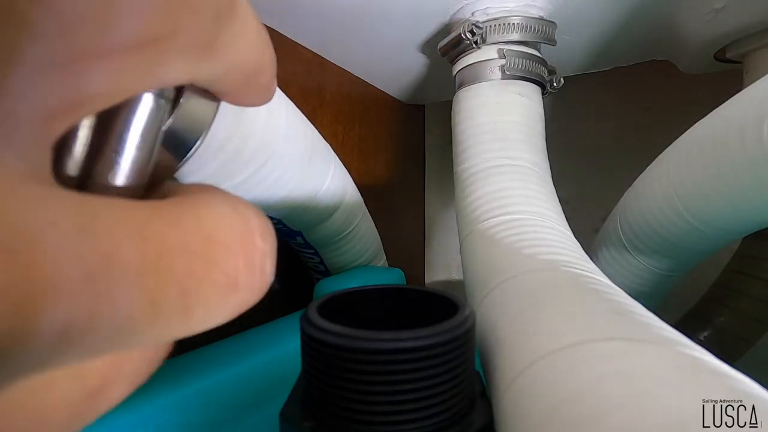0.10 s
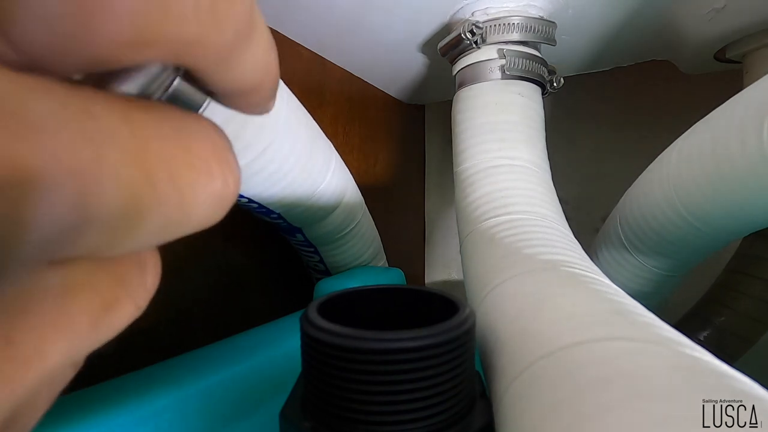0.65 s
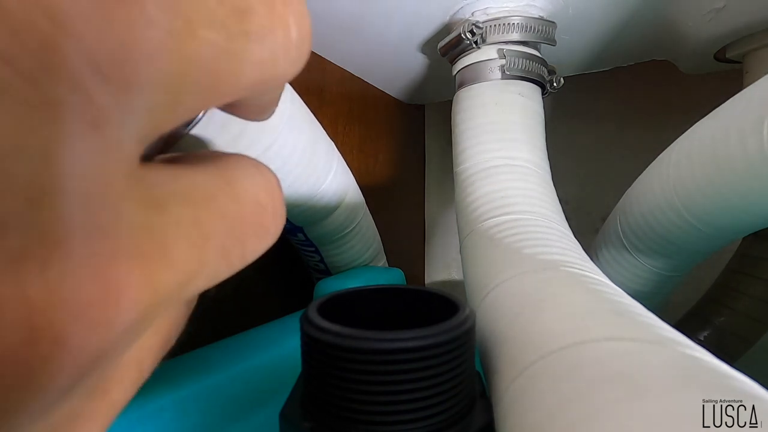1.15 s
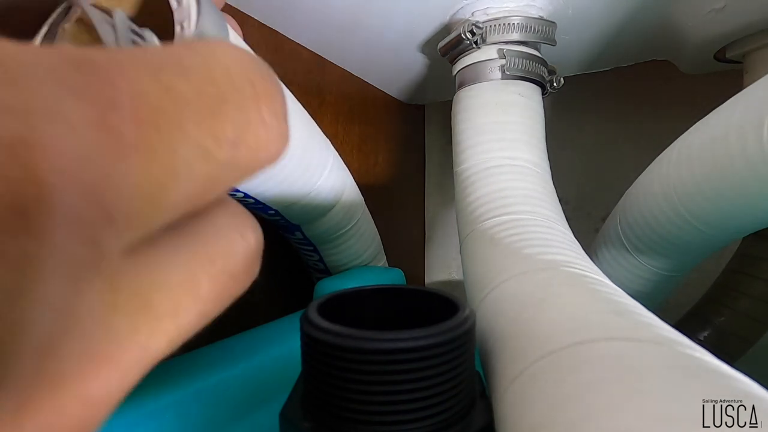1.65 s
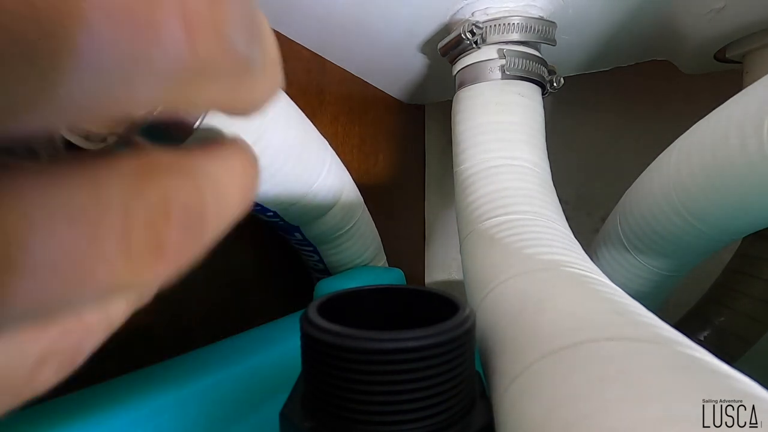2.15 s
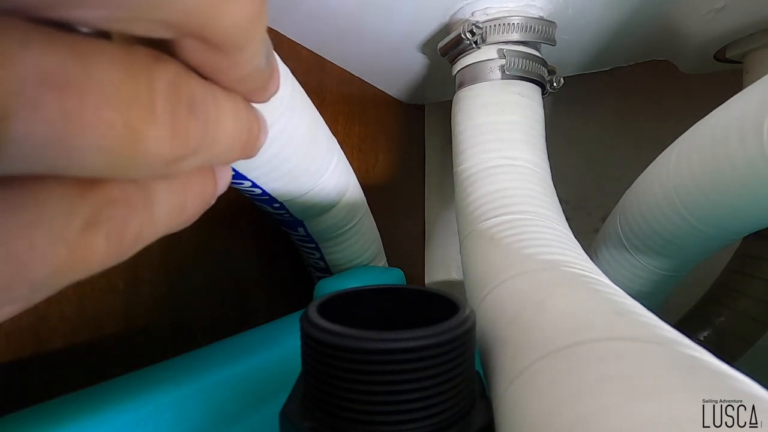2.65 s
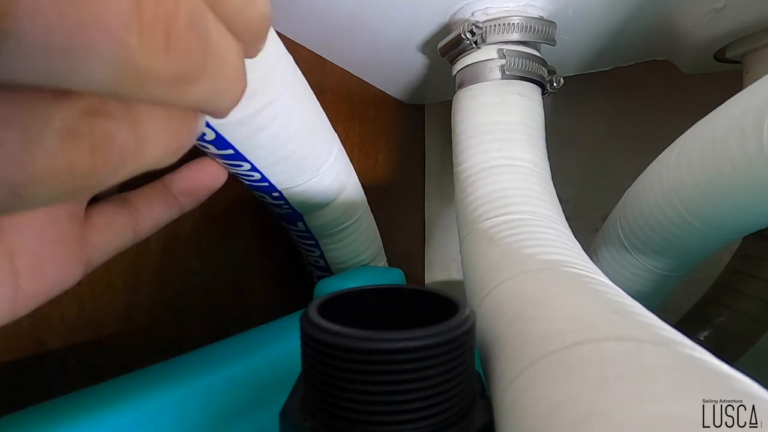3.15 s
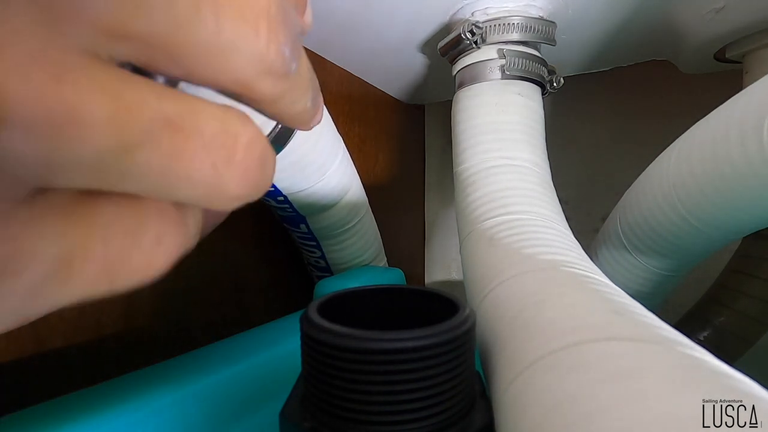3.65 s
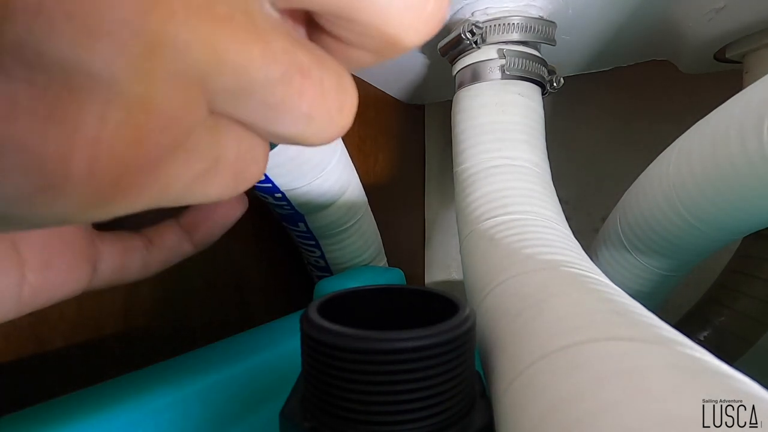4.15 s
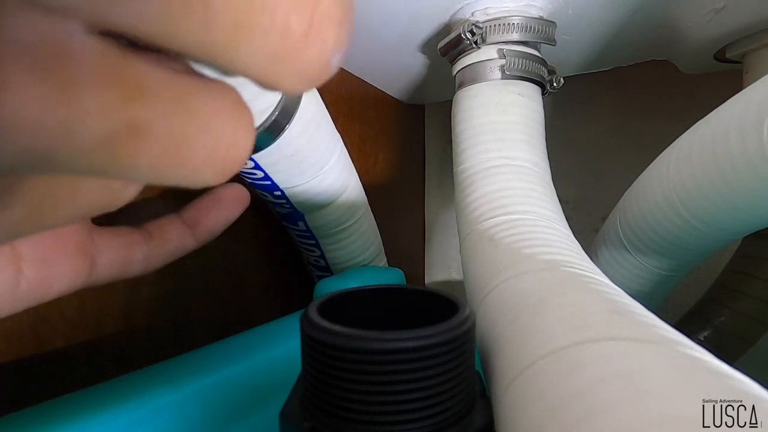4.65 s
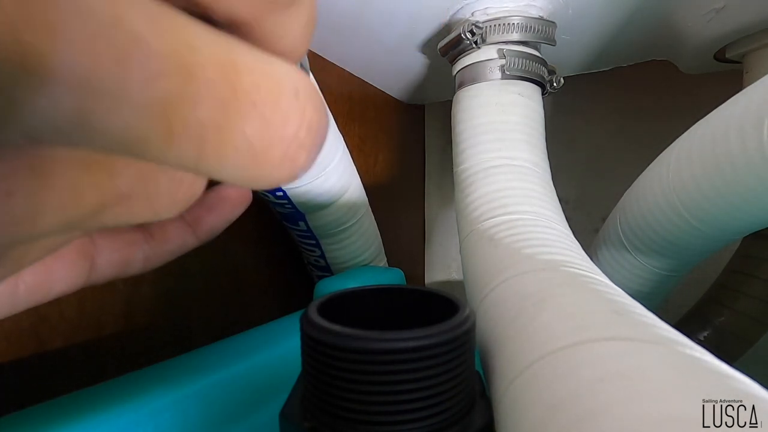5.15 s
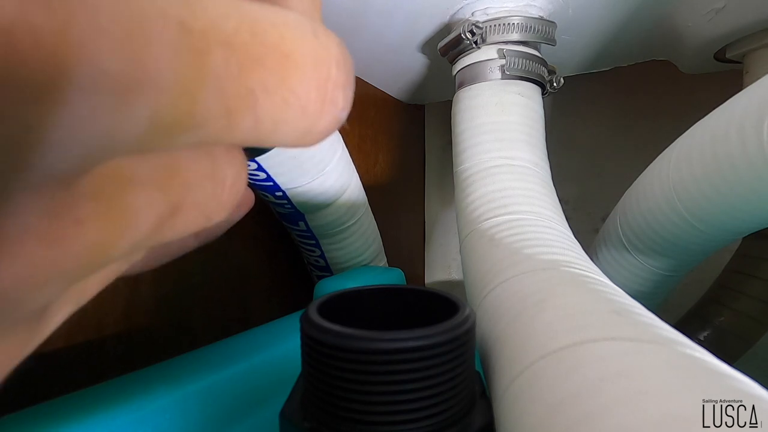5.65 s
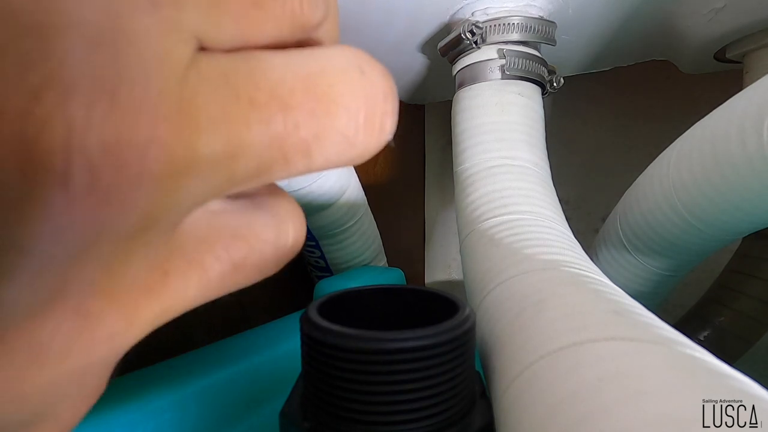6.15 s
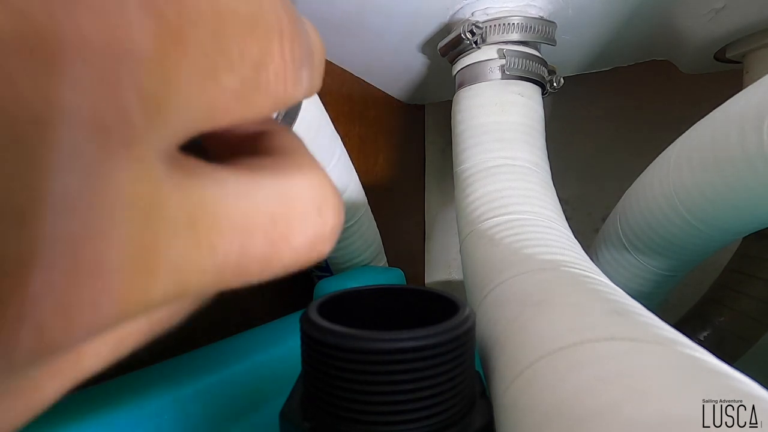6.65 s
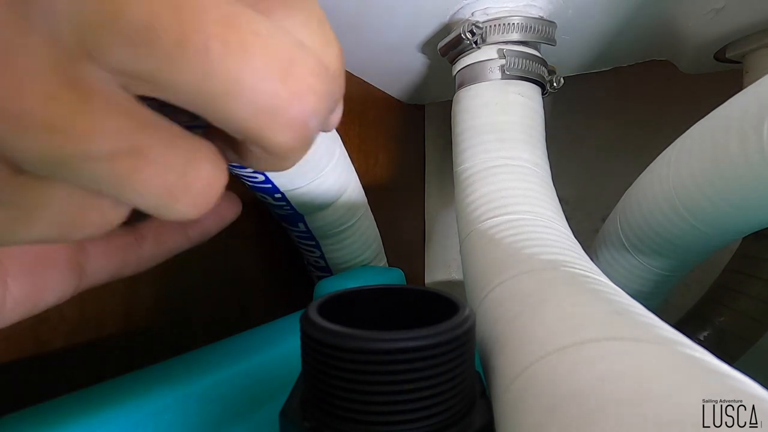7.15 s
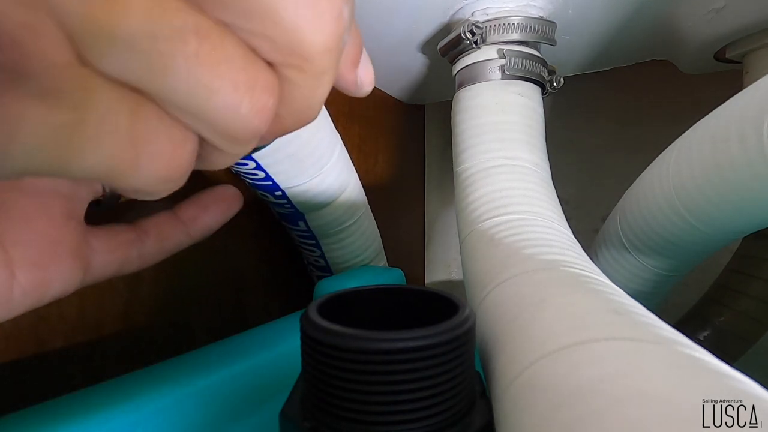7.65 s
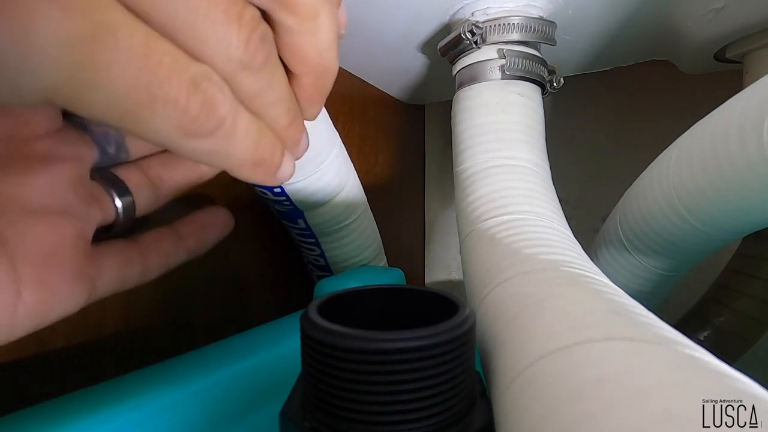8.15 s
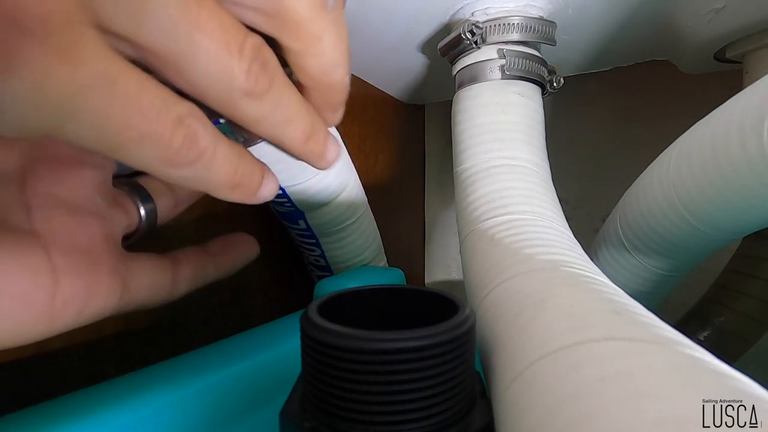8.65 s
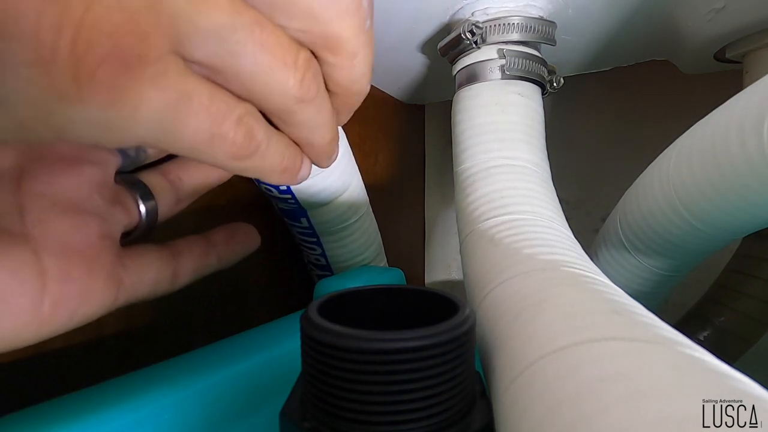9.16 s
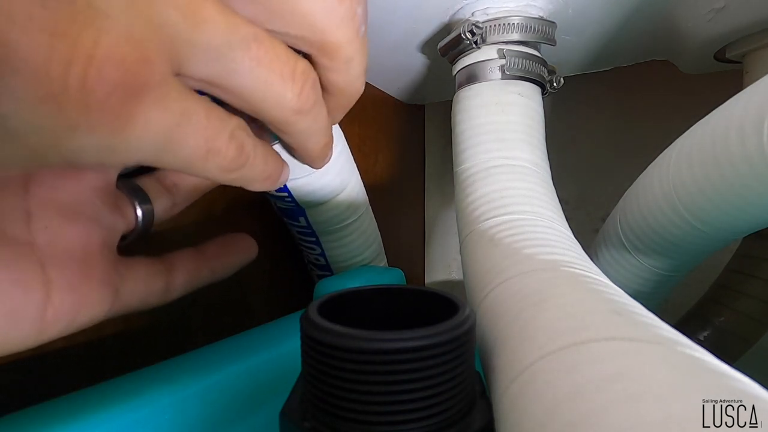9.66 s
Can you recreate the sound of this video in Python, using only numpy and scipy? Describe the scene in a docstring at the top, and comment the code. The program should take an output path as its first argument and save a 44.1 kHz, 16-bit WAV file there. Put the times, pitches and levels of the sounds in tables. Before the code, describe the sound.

Hands fit metal bands onto a flexible plastic hose. A bright jingle and sharp clicks come first, then mostly dull, bassy bumps and muffled creaking pressure with weak ticks and rubbing. Stronger thuds come near the end, then crisp steel taps. The small enclosed space gives short dense reflections; the close microphone picks up handling rumble, a low murmur and faint hiss.

```python
"""Hands work steel clamps onto a ribbed plastic hose in a cramped boat locker, close to a small camera.
Throughout: a low murmur, hiss, and dull thuds of bumps swinging the panel under the microphones.
Until 0.45 s loose clamps jingle, damped more and more; then gripped clamps tap and scrape along the
hose, with faint squeaks from 0.87 s; bright taps return from 8.8 s. Hits and strokes are noise and
pulses through resonances of panel, steel and hose; dense reflections make the locker."""
import sys
import numpy as np
from scipy import signal
from scipy.fft import rfft, irfft, next_fast_len
from scipy.io import wavfile
from scipy.ndimage import uniform_filter1d, map_coordinates

SR = 44100
rng = np.random.default_rng(int(sys.argv[2]) if len(sys.argv) > 2 else 0)


def convert_level_to_amplitude(level_db):
    """Map a level in decibels to its linear amplitude factor."""
    exponent = np.asarray(level_db, float) / 20
    return 10 ** exponent


def transcribe(u):
    """Save the signal u as a 16-bit wav file named by the first command-line argument.

    u: samples, shape (n,) or (channels, n), limited to [-1, 1]; the rate is SR.
    q: integer samples, one column per channel.
    """
    v = np.clip(np.atleast_2d(u).T, -1, 1)
    q = np.round(v * 32767).astype(np.int16)
    wavfile.write(sys.argv[1], SR, q)


N = 430857

# hands leaning on the panel: t/s, drive level/dB
PRESSURE = [(0.0, -37), (0.38, -37), (0.62, -28.5), (1.0, -25), (1.3, -31.5), (1.9, -37), (2.5, -25),
            (2.75, -42.5), (3.26, -33), (4.49, -33), (4.621, -40.5), (5.85, -36.5), (6.26, -26),
            (7.24, -65), (7.9, -25), (8.3, -40), (8.76, -31.5), (9.09, -42), (9.77, -38)]
# upper panel modes under the leaning hands: t/s, level/dB re main drive
UPPER_LEVEL = [(0, -18.5), (0.8, -12.5), (1.2, -17), (2.5, -16.5), (4.0, -13), (6.3, -17.5), (7.5, 3),
               (8.0, -15.5), (9.77, -10)]
# still locker air, spectrum shape: f/Hz, level/dB per Hz
AIR_SPECTRUM = [(15, -44), (25, -7), (86, 1.5), (122, -1), (340, -17), (537, -38), (703, -45), (895, -34.5),
                (1410, -36.5), (2230, -48.5), (7300, -55.5), (11200, -73.5), (15500, -91.5)]
AIR_DB = -39.5
# left-right likeness of the still air: f/Hz, likeness/1
AIR_LIKENESS = [(25, .6), (60, 0.96), (180, 1), (550, 0.39), (1650, 0.12), (4970, 0.11), (15000, 0.13)]
# taps of clamp on hose: t/s, crack level/dB, hollow knock level/dB re crack, brightness/dB per octave
TAPS = [(0.002, -41.5, -18, 6), (0.046, -30, -17.5, 7), (0.351, -36.5, -16, 1.5), (0.535, -33, -10, 3.5),
        (0.792, -66, 22, -8), (1.047, -33.5, -17, 9), (1.172, -57.5, 2, 6), (1.303, -41.5, -14.5, 3),
        (1.423, -57.5, -8, -1), (2.346, -47.5, 5.5, 4.5), (2.469, -57.5, 7.5, -3), (2.565, -57, 1, 5.5),
        (2.611, -58, 5.5, -0.5), (3.271, -57.5, 0, 4), (3.389, -57, -7, -6), (3.81, -71.5, 34, 3),
        (3.897, -65, 13, -14), (4.065, -51.5, 7, -12.5), (4.118, -60, -10, -4), (4.337, -51.5, -6.5, -18.5),
        (4.443, -56.5, 2, -13), (4.833, -54.5, -6, -4), (4.932, -52.5, 4.5, -3.5), (5.35, -57, -3, 11),
        (5.474, -55.5, -16, 3), (5.538, -59.5, 3, -1.5), (5.725, -59.5, 11.5, 8), (5.935, -51.5, 3.5, -7),
        (6.076, -57, 1.5, 6.5), (6.231, -50, 1.5, -3.5), (7.003, -47.5, 2, 0.5), (7.208, -61, 3, -2),
        (7.311, -61, 3.5, -4.5), (7.372, -52.5, -1.5, -6), (7.448, -53.5, 1, -8), (7.619, -56.5, -1, 1),
        (7.738, -52, -0.5, 3), (7.797, -41, 4, 0), (7.857, -61, 10, 4), (7.992, -47.5, 3, 13),
        (8.55, -50, -15, 12.5), (8.565, -56, -1, 5), (8.829, -28.5, -0.5, 6.5), (9.22, -40.5, -13.5, 13.5),
        (9.416, -37.5, -11.5, 14), (9.608, -46, -16, 14.5), (9.748, -35.5, -28, 14)]
# clamp band modes: f/Hz, level/dB, t60/s at damping 1
STEEL_MODES = [(1400, -9, .07), (1650, -13, .06), (2505, -11, .09), (2820, -10, .05), (3438, -4, .07),
               (3687, -7, .09), (3995, 3, .065), (4729, 3.5, .09), (5296, -2, .06), (5630, -9, .07),
               (6070, -8, .06), (7206, 0, .09), (7709, 0, .07), (7838, -8, .07), (9098, -13, .06),
               (11350, -24, .05), (12200, -25, .05)]
LOOSE_UNTIL_S = 0.45
# scrape spectrum shape: f/Hz, level/dB per Hz
SCRAPE_SPECTRUM = [(1060, -27.5), (1800, -6), (2800, -8), (3670, -9), (7610, -8.5), (8400, -20),
                   (9790, -22), (13800, -32.5), (15500, -49)]
# air modes of hose and locker: f/Hz, width/Hz, level/dB
HOLLOW_MODES = [(590, 240, -9.5), (760, 110, -4), (857, 39.3, 4), (933.6, 63, 3.5), (1080, 280, -5),
                (1387, 230, -3.5), (1684, 380, -9)]
# strokes of skin and steel along the hose ribs: start t/s, nominal length/s, level/dB
RUBS = [(0.031, 0.053, -36.5), (0.094, 0.053, -44), (0.155, 0.059, -34), (0.234, 0.17, -56.5),
        (0.313, 0.067, -45), (0.515, 0.077, -45), (0.735, 0.087, -67), (0.876, 0.26, -72.5),
        (1.04, 0.026, -47.5), (1.188, 0.084, -54.5), (1.247, 0.0785, -54), (1.539, 0.11, -71),
        (1.866, 0.15, -71), (2.099, 0.16, -77), (2.328, 0.034, -59.5), (2.534, 0.067, -65),
        (2.759, 0.033, -71.5), (3.007, 0.041, -71.5), (3.105, 0.068, -70.5), (3.401, 0.1, -55.5),
        (3.758, 0.2037, -73.5), (4.029, 0.13, -67), (4.215, 0.029, -66), (4.307, 0.097, -65),
        (4.615, 0.071, -73.5), (4.848, 0.15, -69.5), (5.114, 0.037, -68.5), (5.717, 0.045, -57),
        (6.06, 0.089, -68.5), (6.169, 0.18, -62.5), (6.35, 0.19, -73.5), (6.544, 0.093, -71.5),
        (6.649, 0.096, -63), (6.714, 0.093, -51), (6.93, 0.14, -64), (7.586, 0.069, -64),
        (7.708, 0.13, -63.5), (7.837, 0.2, -67), (8.107, 0.13, -59.5), (8.244, 0.11, -59.5),
        (8.536, 0.066, -59), (8.611, 0.03, -61.5), (8.675, 0.032, -70), (8.708, 0.046, -69.5),
        (8.782, 0.021, -66), (8.853, 0.2, -67), (9.29, 0.1, -68.5), (9.444, 0.063, -64.5)]
# hollow part of the strokes: t/s, level/dB re hiss drive
HOLLOW_PART = [(0, -24), (0.3, -24.5), (0.75, 5.5), (1.1, -4), (1.6, 15.5), (3.8, 3), (5.0, 2), (6.2, 5),
               (8.3, 9), (8.75, 1), (9.3, -13)]
# bumps on the panel: t/s, swing peak/dB, swing f/Hz, jolt to the upper modes/dB re swing peak
THUDS = [(0.075, -20.5, 104.9, -10.5), (0.43, -26, 139, -9), (0.543, -19, 126.4, -12),
         (0.602, -17, 158.5, -27), (0.638, -21, 123.5, -7), (0.678, -24, 123, -9), (0.752, -19.5, 161, -9),
         (0.897, -14.5, 150.5, -19), (1.044, -4, 107.5, -11), (1.172, -12.5, 121.7, -7.5),
         (1.501, -22.5, 119.6, -23), (2.139, -22, 119, -32), (2.355, -16, 92.6, -4.5),
         (2.39, -15, 103, -18), (2.417, -19, 101, -29), (2.58, -10, 96.2, -7), (3.031, -19.5, 88.4, -6),
         (3.276, -17, 103.4, -8.5), (3.423, -10, 97.4, -17.5), (3.783, -21.5, 97.2, 1),
         (3.814, -10, 95.1, -5), (3.892, -13, 99.4, -13), (4.061, -19, 89.9, -12.5),
         (4.33, -25, 106.4, -1.5), (4.444, -12.5, 103.7, -8.5), (4.848, -16, 97.6, -16.5),
         (4.935, -10, 143.5, -6.5), (5.364, -22.5, 102.2, -13), (5.73, -3, 96.6, -17.5),
         (5.941, -34, 113, 2), (6.087, -9, 117.3, -12.5), (6.234, -29.5, 99, 0), (6.486, -18, 105, -18),
         (6.665, -18, 105, -10), (6.715, -26, 140, 2.5), (6.754, -33.5, 159, -3.5),
         (6.963, -21, 105.4, -36), (7.008, -21.5, 100.6, -16), (7.624, -4, 95.91, -9),
         (7.745, -16, 103, -8), (7.86, -27, 110, -6.5), (7.999, -5.5, 101.4, -22), (8.166, -16, 110, -8),
         (8.483, -15.5, 105.6, -33), (8.566, -16.5, 118.4, -9.5), (8.838, -5, 111.5, -14.5)]
# panel modes beside the main swing: f/Hz, width/Hz, level/dB
PANEL_MODES = [(56, 15.8, 13.5), (160.6, 20.8, 16), (223, 54, -0.5), (284.7, 22.6, 6), (332.5, 21.9, 2),
               (415.11, 57, -11.5), (582, 54, -26.5)]
# swing t60 at STIFF_HZ; a stiffer panel swings higher and loses STIFF_LOSS_S per 20 Hz, 20 Hz at most
RING_S, STIFF_HZ, STIFF_LOSS_S = 0.25, 95, 0.093
# one singing mode of a band or the panel: start t/s, nominal length/s, f/Hz, level/dB
SQUEAKS = [(0.87, .17, 338, -32), (4.074, .08, 4100, -65.5), (4.615, 0.11, 7639, -71.5),
           (4.824, .16, 7788, -71), (4.868, 0.14, 6301, -65.5), (6.188, 0.15, 6755, -65),
           (6.198, 0.14, 1393, -54.5), (6.886, .09, 1220, -54.5), (6.705, 0.095, 2400, -57),
           (6.72, .07, 3120, -62), (6.998, 0.031, 2410, -48), (7.455, 0.06, 3960, -62),
           (9.403, .03, 5300, -51.5), (9.601, 0.023, 5400, -52), (9.742, .025, 5440, -53),
           (6.16, 0.2, 2400, -61), (7.79, 0.02, 10160, -50), (7.79, .02, 11700, -50)]
# port balance before its slow drift: f/Hz, left over right/dB
PORT_BALANCE = [(60, 2.5), (180, 2), (550, 1.5), (1650, 3), (4970, 5), (15000, -3.5)]


def evened(x):
    """Scales to rms 1."""
    return x / np.sqrt(np.mean(x ** 2) + 1e-20)


def read(points, hz):
    """Reads a spectrum joined on a log-frequency axis."""
    f, value = np.transpose(points)
    return np.interp(np.log(hz + 1), np.log(f + 1), value)


def at_time(points, t):
    """Reads a table joined linearly in time."""
    return np.interp(t, *np.transpose(points))


def add(mix, s, sound):
    """Adds a sound to the mix at s seconds."""
    part = mix[max(round(s * SR), 0):][:len(sound)]
    part += sound[:len(part)]


def resonate(x, hz, width_hz):
    """Two-pole resonance, gain 1 at centre, at least 2 Hz wide."""
    return signal.lfilter(*signal.iirpeak(hz, hz / max(width_hz, 2), SR), x)


def colour(x, gain):
    """Multiplies the spectrum by gain(Hz)."""
    size = next_fast_len(x.shape[-1])
    spectrum = rfft(x, size) * gain(np.fft.rfftfreq(size, 1 / SR))
    return irfft(spectrum, size)[..., :x.shape[-1]]


def body(x, modes):
    """Sums resonances of alternating sign; white noise of rms 1 comes out at rms 1."""
    def ring(v):
        total = 0
        for k, (hz, width_hz, db) in enumerate(modes):
            mode = resonate(resonate(v, hz, 2 * width_hz), hz, width_hz)
            total = total + (-1) ** k * convert_level_to_amplitude(db) * mode
        return total
    return ring(x) / np.linalg.norm(ring(signal.unit_impulse(SR // 4)))


def gritty(count, spread_db, grain):
    """Noise in uneven grains (grain in samples): small slips of surface on surface."""
    slips = convert_level_to_amplitude(spread_db * np.minimum(rng.exponential(1, count // grain + 2), 4))
    lumps = np.interp(np.arange(count) / grain, np.arange(len(slips)), slips)
    return evened(rng.standard_normal(count) * lumps)


def smoothed_grit(count, grain, window):
    """Running rms of gritty noise: an uneven, slower envelope."""
    power = uniform_filter1d(gritty(count, spread_db=2.5, grain=grain) ** 2, window)
    return abs(power) ** 0.5


def pressure():
    """Hands leaning and shifting drive the panel modes with lumpy noise."""
    t = np.arange(N) / SR
    drive = convert_level_to_amplitude(at_time(PRESSURE, t)) * gritty(N, spread_db=4.0, grain=1400)
    upper = convert_level_to_amplitude(at_time(UPPER_LEVEL, t)) * drive
    main_modes = [(46.4, 31.0, -3.5), (97.2, 22.0, 6.0), (131.5, 15, 3.0), (165.0, 25, -6.0)]
    return body(drive, main_modes) + body(upper, PANEL_MODES[2:])


def air():
    """Boat murmur and microphone hiss: shaped noise, partly alike left and right."""
    frames, hz = N // 512 + 5, np.fft.rfftfreq(2048, 1 / SR)
    a, b, c, d = rng.standard_normal((frames, len(hz), 4)).T
    same = np.clip(read(AIR_LIKENESS, hz), -1, 1)[:, None]
    left = a + 1j * b
    right = same * left + np.sqrt(1 - same ** 2) * (c + 1j * d)
    z = np.array([left, right]) * convert_level_to_amplitude(read(AIR_SPECTRUM, hz))[:, None]
    noise = signal.istft(z, nperseg=2048, noverlap=1536)[1][:, :N]
    return convert_level_to_amplitude(AIR_DB) * evened(noise)


def closing(s):
    """Damping of the loose clamps grows as the fingers close on them."""
    return np.interp(s, [0.22, LOOSE_UNTIL_S], [1.1, 2.9])


def chime(drive, luck, damping, bend=0.0):
    """Rings the clamp band: luck varies mode levels; damping shortens the ring, bend shifts pitches."""
    favour_db, bent = 3 * luck, 1 + bend * luck[::-1]
    contrast = 1 if damping < 3 else 0.45  # a gripped band has more even modes
    total = 0
    for (hz, db, t60), extra_db, ratio in zip(STEEL_MODES, favour_db, bent):
        pitch_hz = hz * ratio
        mode = resonate(resonate(drive, pitch_hz, hz / 5), pitch_hz, 2.2 * damping / t60)
        total = total + convert_level_to_amplitude(contrast * db + extra_db) * mode * np.sqrt(t60 * SR / damping / 50)
    return total


def taps():
    """Sharp gritty bursts: bright crack, hollow knock and steel ring."""
    out, t = np.zeros(N), np.arange(SR // 3) / SR
    luck = rng.standard_normal((len(TAPS), len(STEEL_MODES)))
    for (s, db, hollow_db, tilt_db), favour in zip(TAPS, luck):
        front = gritty(len(t), spread_db=-5.0, grain=40) * (1 - np.exp(-t / 0.00087))
        tail = front * convert_level_to_amplitude(-60 * t / 0.093)
        dull_tail = colour(tail, lambda hz: 1 / (1 + (hz / 7000) ** 2))  # treble dies first
        burst = front * np.exp(-t / 0.0048) + dull_tail

        def tint(hz):
            return convert_level_to_amplitude(read(SCRAPE_SPECTRUM, hz) + tilt_db * np.log2(np.maximum(hz, 1500) / 4000))
        crack = colour(burst, tint) / np.sqrt(np.mean(tint(np.linspace(0, SR / 2, 500)) ** 2))
        if s < LOOSE_UNTIL_S:
            ring = convert_level_to_amplitude(1.5) * chime(burst, favour, closing(s))
        else:
            ring = convert_level_to_amplitude(0.21 * tilt_db - 14.5) * chime(crack, favour, damping=7, bend=0.061)
        # one blow, then a shiver
        thump = 22 * signal.unit_impulse(len(t), 20) + front * convert_level_to_amplitude(-60 * t / 0.1)
        # hollow or dull taps sound deeper
        depth_db = 0.6 * max(hollow_db - 7, 0) - 0.3 * tilt_db
        hose = [(hz, width_hz, mode_db + 1.5 * k - depth_db * np.log2(hz / 1000))
                for (hz, width_hz, mode_db), k in zip(HOLLOW_MODES, favour)]
        add(out, s, convert_level_to_amplitude(db) * (crack + ring) + convert_level_to_amplitude(db + hollow_db) * body(thump, hose))
    return out


def stroke(length_s):
    """Swell and soft fade, centred half a length after its start."""
    length_s = max(length_s, 0.01)
    u = np.arange(round(length_s * 1.6 * SR)) / SR / length_s - 0.5
    return np.exp(-2 * (u / 0.55) ** 2) * np.minimum(1, (u + 0.5) / 0.2) * 1.2


def rubs():
    """Fine slips hiss and wake the hollow hose, panel and gripped steel; loose clamps rattle and chime."""
    bright, hollow, jingle = np.zeros((3, N))
    luck = rng.standard_normal((len(RUBS), len(STEEL_MODES)))
    for (s, length_s, db), favour in zip(RUBS, luck):
        loose = s < LOOSE_UNTIL_S
        swell = np.pad(stroke(length_s), (0, SR // 5))
        caught = swell * smoothed_grit(len(swell), grain=300, window=100)  # catches on the ribs
        caught *= np.linalg.norm(swell) / np.linalg.norm(caught)
        add(bright, s, convert_level_to_amplitude(db - 10 * loose) * caught)
        add(hollow, s, convert_level_to_amplitude(db + at_time(HOLLOW_PART, s)) * caught)
        rattle = swell * gritty(len(swell), spread_db=4.0, grain=60)  # bands knock in uneven ticks
        clatter = convert_level_to_amplitude(-5) * chime(rattle, favour[::-1], 3.5 if loose else 6, bend=0.06)
        if loose:
            clatter += convert_level_to_amplitude(1.5) * chime(rattle, favour, closing(s), bend=0.003)
        add(jingle, s, convert_level_to_amplitude(db) * clatter)
    fidget = convert_level_to_amplitude(-78.5) * smoothed_grit(N, grain=2500, window=800)  # fingers never quite rest
    grit = gritty(N, spread_db=3.5, grain=30)
    hiss = evened(colour(grit, lambda hz: convert_level_to_amplitude(read(SCRAPE_SPECTRUM, hz))))
    # the dragged hose shakes the panel
    shake = convert_level_to_amplitude(17) * body(hollow * rng.standard_normal(N), PANEL_MODES[1:])
    hose = body((hollow + 2.7 * fidget) * rng.standard_normal(N), HOLLOW_MODES)
    return (bright + fidget) * hiss + hose + jingle + shake


def thuds():
    """A push swings the panel at a pitch set by where the hand rests; jolts wake the upper modes."""
    swing, blows, t = np.zeros(N), np.zeros(N), np.arange(SR // 2) / SR
    luck = rng.random((len(THUDS), 2))
    for (s, db, hz, jolt_db), (wait, share) in zip(THUDS, luck):
        t60 = max(RING_S - STIFF_LOSS_S * np.clip((hz - STIFF_HZ) / 20, -1, 1), 0.05)
        envelope = (1 - np.exp(-t / 0.0044)) * convert_level_to_amplitude(-60 * t / t60)
        add(swing, s, convert_level_to_amplitude(db) * envelope / envelope.max() * np.sin(2 * np.pi * hz * t))
        jolt = convert_level_to_amplitude(db + jolt_db) * np.hanning(60)
        add(blows, s + 0.00286, jolt)
        add(blows, s + 0.00571 + 0.01577 * wait, -share * jolt)  # rebound
    return swing + body(blows, PANEL_MODES)


def squeaks():
    """A rubbed or tapped band, or the panel, sings: gritty noise through one narrow resonance."""
    out = np.zeros(N)
    for s, length_s, hz, db in SQUEAKS:
        swell = stroke(length_s)
        grit = gritty(SR // 2, spread_db=2, grain=300)
        tone = evened(body(grit, [(hz, 25 + hz / 70, 0)]))
        add(out, s, convert_level_to_amplitude(db) * swell * tone[:len(swell)])
    return out


def locker(x, t60=0.075):
    """Dense early reflections off near walls, different at each port."""
    delays = np.arange(40, 8000, 20) + rng.integers(0, 20, (2, 398))
    tail = np.zeros((2, 8100))
    echoes = rng.choice([-1., 1.], delays.shape) * convert_level_to_amplitude(-60 * delays / SR / t60)
    np.put_along_axis(tail, delays, echoes, 1)
    return signal.fftconvolve(x[None], tail / np.linalg.norm(tail[0]), axes=1)[:, :N]


def scene():
    """Sums direct sound, locker reflections, panel and air at two ports."""
    airborne = taps() + rubs() + squeaks()
    panel = thuds() + pressure()
    at = np.arange(N)
    # hands drift towards the right port: left lag grows to 1.54 samples
    late = map_coordinates(airborne, [at - 1.54 * at / N], order=3)
    radiated = colour(panel, lambda hz: hz / (hz + 300))
    reflected = locker(convert_level_to_amplitude(-8.5) * airborne + convert_level_to_amplitude(-8.5) * radiated)
    return np.array([late, airborne]) + reflected + panel + air()


def band_limit(x):
    """A steep low-pass at the top of the band."""
    return signal.sosfilt(signal.butter(12, 15700, fs=SR, output="sos"), x)


def record(dry):
    """The ports differ in gain, more so as the grip on the panel shifts; full scale clips."""
    ports = colour(dry, lambda hz: convert_level_to_amplitude(np.outer([0.5, -0.5], read(PORT_BALANCE, hz))))
    drift_db = -1.6 * np.exp(-np.arange(N) / SR / 7.4)  # left over right
    ports *= convert_level_to_amplitude(np.outer([0.5, -0.5], drift_db))
    return band_limit(np.clip(ports, -1, 1))


dry = scene()
out = record(dry)
transcribe(out)
```